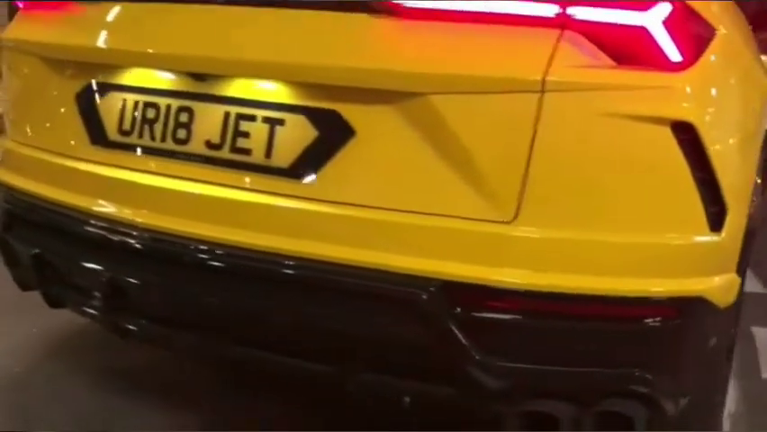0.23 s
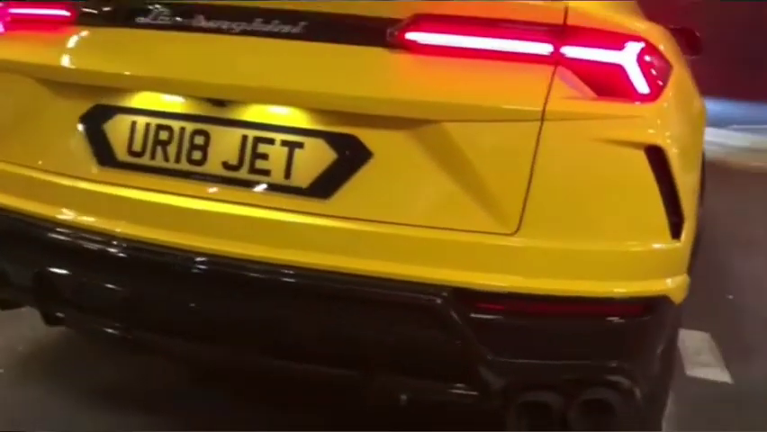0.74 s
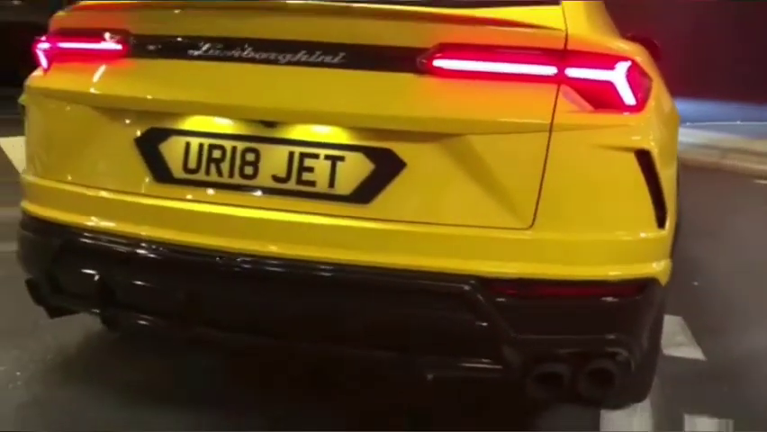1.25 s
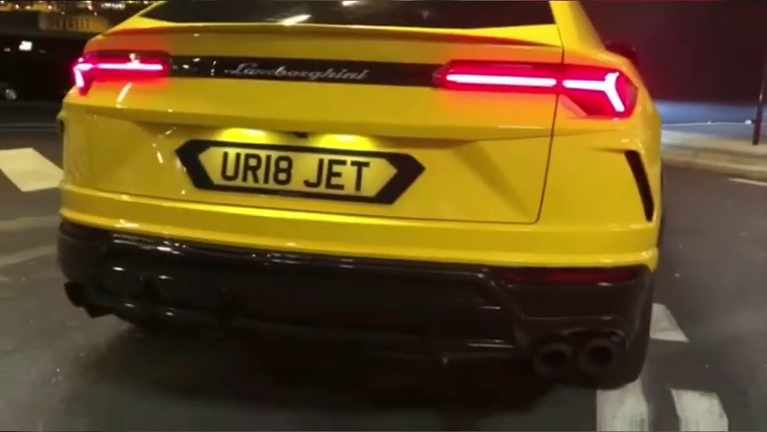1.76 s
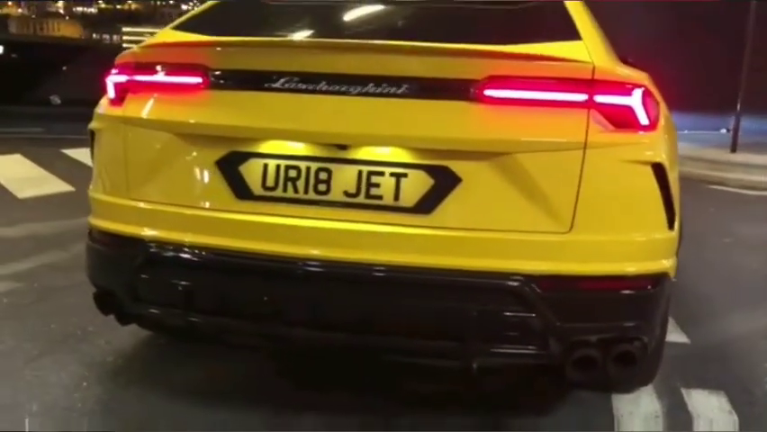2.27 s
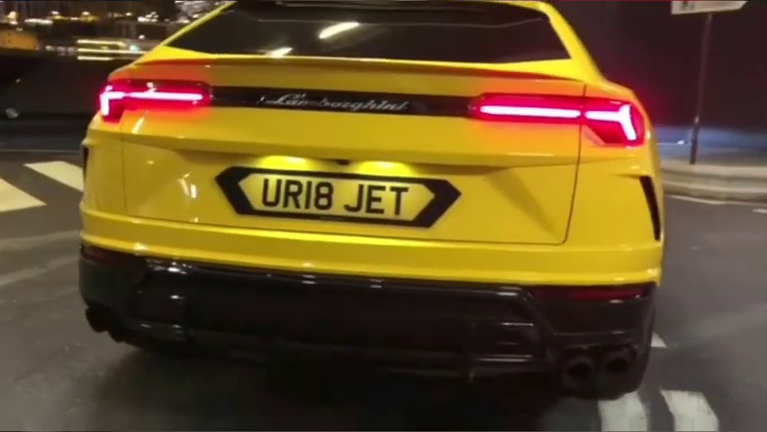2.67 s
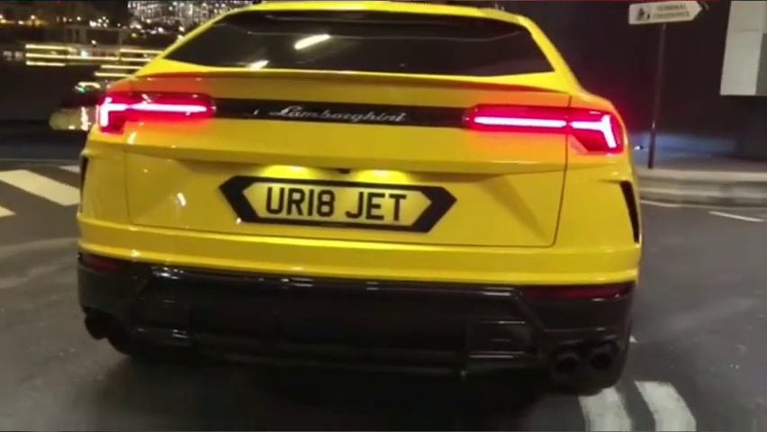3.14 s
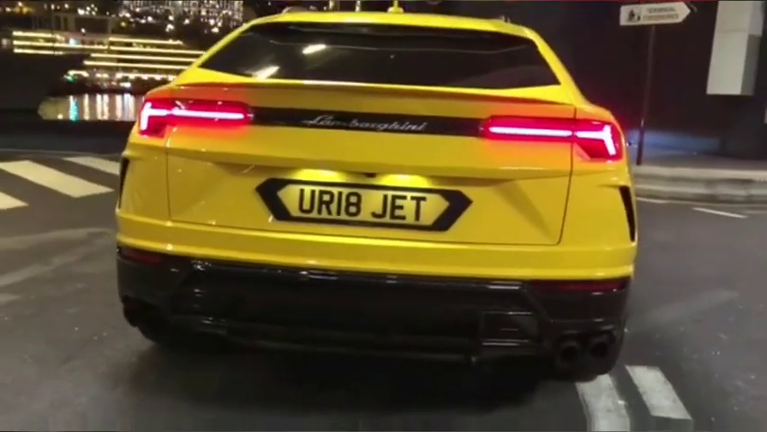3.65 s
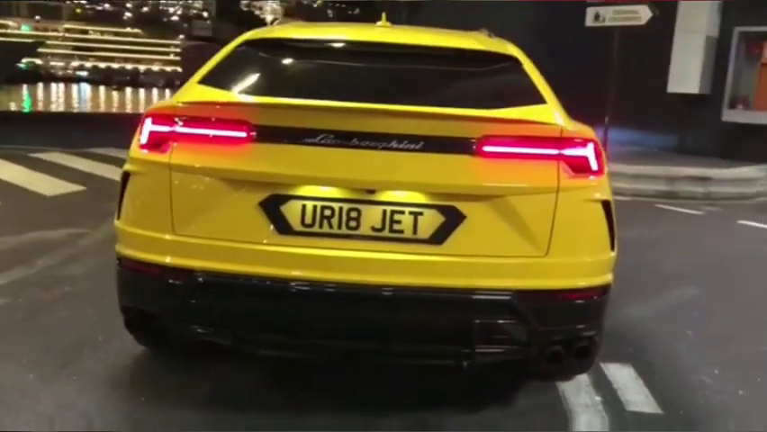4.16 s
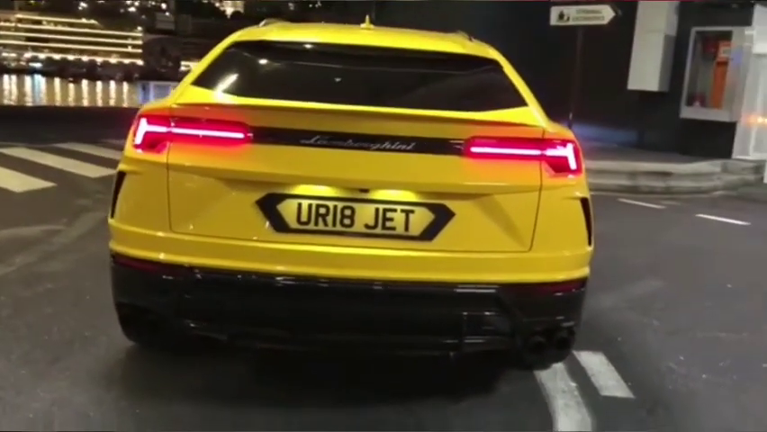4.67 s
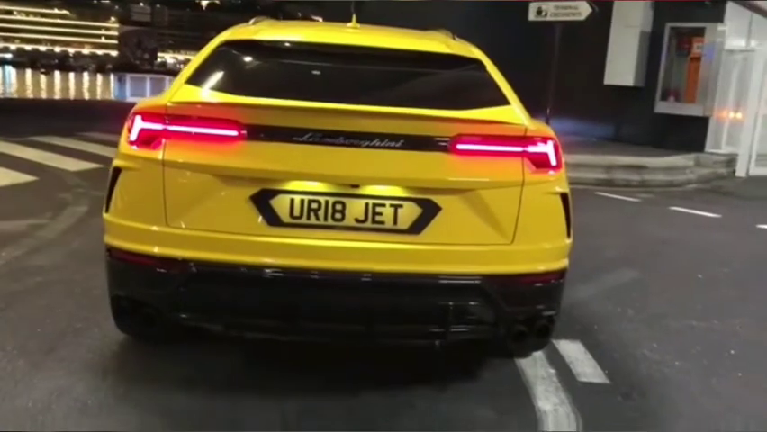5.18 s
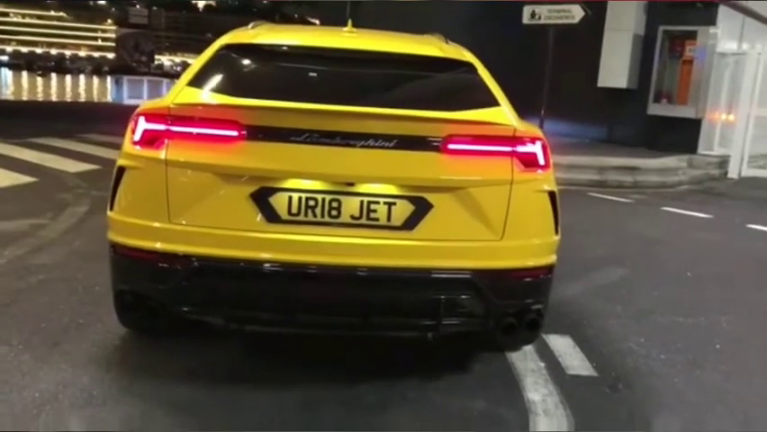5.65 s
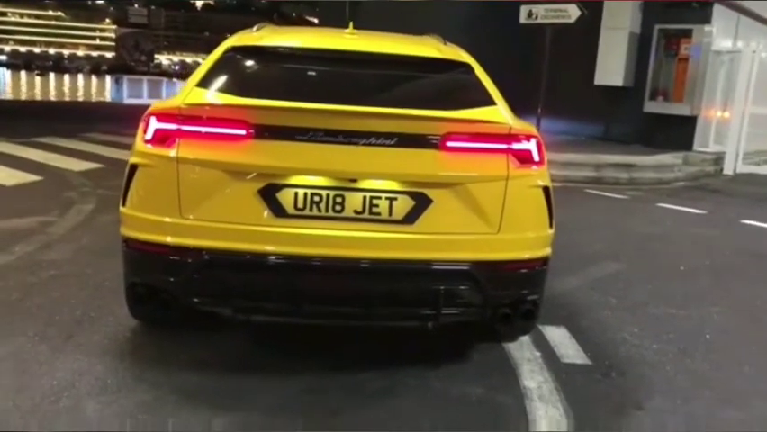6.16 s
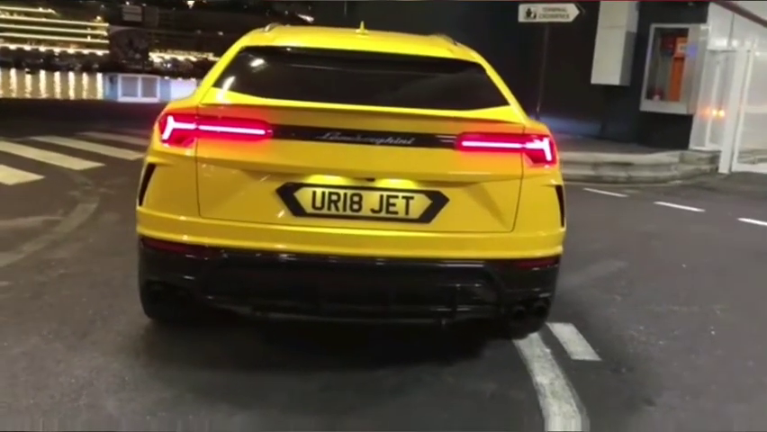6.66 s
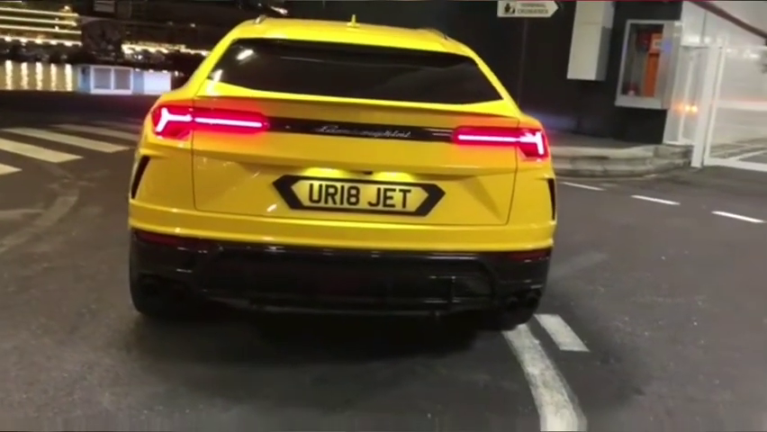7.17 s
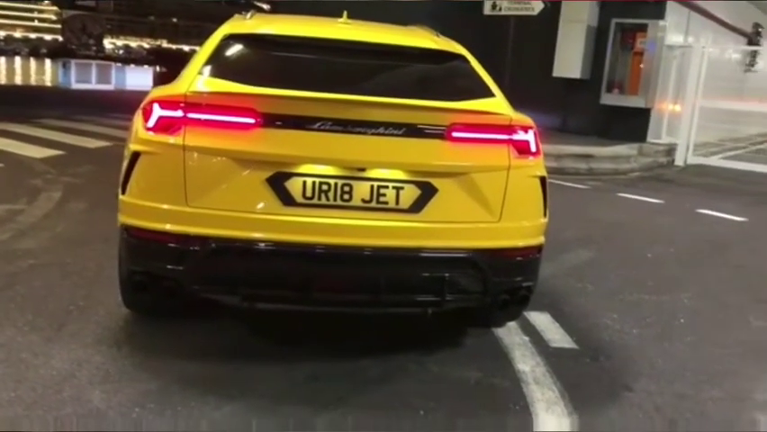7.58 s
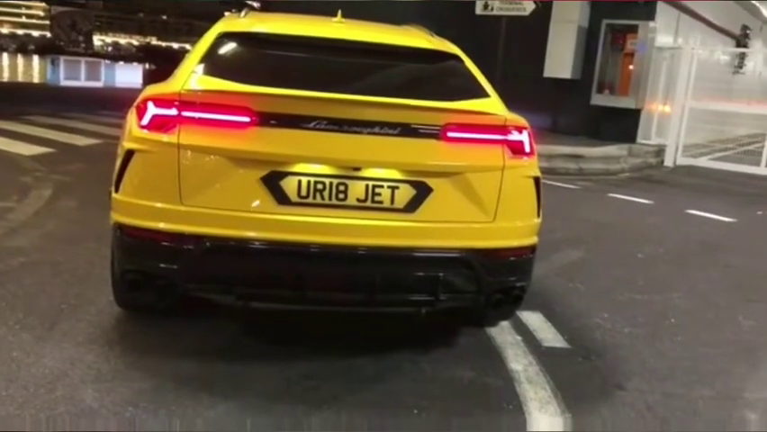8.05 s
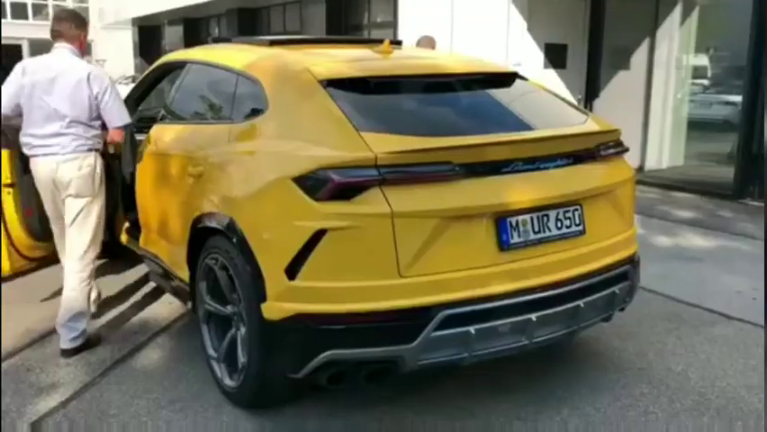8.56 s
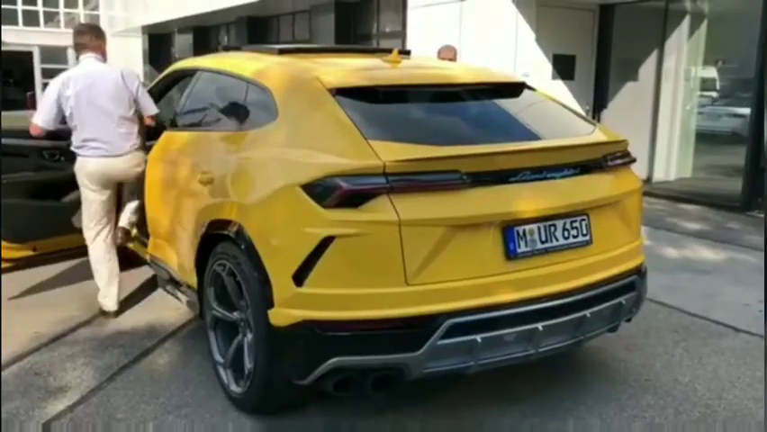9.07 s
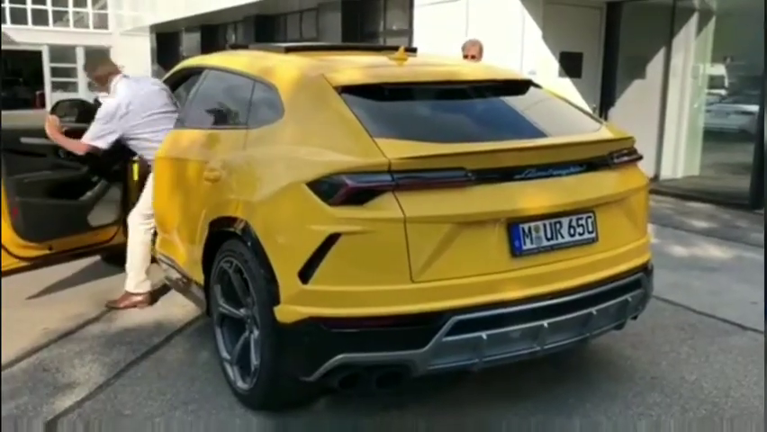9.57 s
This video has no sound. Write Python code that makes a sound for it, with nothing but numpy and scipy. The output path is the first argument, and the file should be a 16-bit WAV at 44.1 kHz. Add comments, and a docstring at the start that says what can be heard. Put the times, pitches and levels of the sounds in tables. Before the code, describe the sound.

A powerful V8 car revs five times with popping exhaust and air hisses, then cuts abruptly to a quiet idle.

```python
"""Turbo V8 revving at night

Five revs in a street, heard from just behind the tailpipes: the firing pulses make a deep note, a rumble
and a rasp. Unburnt fuel pops in the exhaust as the revs fall, and valves let off air with a hiss.
The sound cuts off abruptly; after a short silence a car idles quietly, farther away, and shoes scuff."""
import sys
import numpy as np
from scipy import signal
from scipy.fft import rfft, irfft, next_fast_len
from scipy.io import wavfile
from scipy.ndimage import uniform_filter1d, minimum_filter1d

SR = 44100
rng = np.random.default_rng(int(sys.argv[2]) if len(sys.argv) > 2 else 0)


def persist_wave(psi):
    """Save psi, clipped to +-1, as 16-bit WAV."""
    counts = np.round(np.clip(psi, -1, 1) * 32767).astype(np.int16)
    wavfile.write(sys.argv[1], SR, np.atleast_2d(counts).T)


N = 433062
TIME = np.arange(N) / SR

# punch of each cylinder, in firing order: level/dB
CYLINDER_DB = [0.5, 0.5, -1.5, -3, 2.5, 3.5, 2, 1.5]
# throttle blips: opens/s, crest/s, target firing rate/Hz, note/dB, rasp/dB, rush/dB
THROTTLE_BLIPS = [(0.881, 1.108, 195, -12.5, -16.5, -30), (2.668, 2.989, 202.9, -13, -17, -29),
                  (4.427, 4.65, 184.4, -20, -27, -40.5), (5.772, 6.074, 216.3, -15.5, -20.5, -33.5),
                  (7.835, 8.089, 179.5, -13, -20, -34.5)]
# fuel smouldering in the pipes: start/s, end/s, note lift/dB, rumble lift/dB, rasp lift/dB
SMOULDERS = [(1.305, 1.816, 2.5, 5.5, 2.5), (4.873, 5.242, -1, 2.5, 1), (6.26, 6.784, -2, 7, 2.5)]


def amp(db):
    """Decibels to gain."""
    return 10 ** (np.asarray(db) / 20)


def unit(x):
    """Scales to rms 1."""
    return x / np.sqrt(np.mean(x ** 2) + 1e-20)


def read(points, hz):
    """Reads a curve on a log-frequency axis."""
    f, value = np.transpose(points)
    return np.interp(np.log(hz + 1), np.log(f + 1), value)


def add(mix, s, sound):
    """Mixes a sound in at s seconds."""
    part = mix[round(s * SR):][:len(sound)]
    part += sound[:len(part)]


def gate(start, end, rise, fall):
    """Ramps from 0 to 1 after start and back to 0 after end."""
    return np.clip((TIME - start) / rise, 0, 1) * np.clip(1 - (TIME - end) / fall, 0, 1)


def wander(rate_hz):
    """Slow random drift of rms 1."""
    hz = np.fft.rfftfreq(N // 64, 64 / SR)
    slow = irfft(rfft(rng.standard_normal(N // 64)) / (1 + (hz / rate_hz) ** 4))
    return unit(np.interp(np.arange(N) / 64, np.arange(len(slow)), slow))


def colour(x, points, size=8192):
    """Causal EQ of unit energy: the curve sets only the shape, and falls steeply past its ends."""
    hz = abs(np.fft.fftfreq(size, 1 / SR)) + 1
    octaves_out = np.maximum(np.log2(points[0][0] / hz), 0) + np.maximum(np.log2(hz / points[-1][0]), 0)
    log_gain = np.log(amp(np.maximum(read(points, hz) - 30 * octaves_out, -100)))
    taps = np.fft.ifft(np.exp(np.conj(signal.hilbert(log_gain)))).real[:size // 2]
    return signal.oaconvolve(x, taps / np.linalg.norm(taps))[:len(x)]


def low_pass(x, edge_hz):
    """Steep high cut."""
    return signal.oaconvolve(x, signal.firwin(511, edge_hz, window=("kaiser", 9), fs=SR), "same")


def ringing(modes, t):
    """Damped modes struck at t = 0."""
    return sum(amp(db) * np.exp(-t / decay) * np.sin(2 * np.pi * hz * t) for hz, db, decay in modes)


def street_echo(x, echoes_per_s=2000):
    """Scattered echoes from road and house fronts, each band dying at its own speed."""
    # ring of the street: f/Hz, t60/s
    reverb_times = [(60, .25), (250, 0.99), (1000, 0.63), (4000, 0.51), (12000, 0.53)]
    taps = rng.standard_normal(SR) * (rng.random(SR) < echoes_per_s / SR)
    taps[:int(.005 * SR)] = 0  # pre-delay
    hz, t, bands = signal.stft(taps, SR, nperseg=256)
    fade = amp(-60 * t / read(reverb_times, hz)[:, None])
    tail = signal.istft(bands * fade, SR, nperseg=256)[1]
    return signal.fftconvolve(x, tail / np.linalg.norm(tail))[:N]


def hisses(bursts):
    """Bursts of bright noise that swell and die away."""
    # tone of the hiss: f/Hz, level/dB
    air_eq = [(500, -17), (1300, 18), (3000, 7.5), (5000, 7.5), (7000, 6), (10000, 2), (13500, -4)]
    t, level = np.arange(SR) / SR, np.zeros(N)
    for s, db, decay in bursts:
        rise = decay ** 2 / 0.1  # a long burst also opens slowly
        shape = (1 - np.exp(-(t / rise) ** 2)) * np.exp(-t / decay)
        add(level, s, amp(db) * shape / shape.max())
    return colour(level * rng.standard_normal(N), air_eq)


def shoe_scuffs():
    """Soles brush the ground beside the idling car."""
    # scuffs: t/s, level/dB, decay/s
    scuffs = [(8.872, -62, .012), (9.125, -52, 0.033), (9.323, -52.5, 0.038)]
    return hisses(scuffs)


def distant_idle(level_db=-44, waver_db=.8):
    """The soft wash of an idling car, with a few wavering tones."""
    # tone of the wash: f/Hz, level/dB
    wash_eq = [(15, -41), (25, -18), (72, -1), (233, -8.5), (272, -10.5), (293, -13), (431, -16),
               (1860, -21), (2530, -29), (3530, -31), (3820, -34), (6370, -43), (9370, -48), (10600, -49),
               (11500, -50), (15000, -73), (22000, -120)]
    # tones in the hum: f/Hz, level/dB
    tones = [(57.5, -58), (86.1, -51.5), (107, -63), (269.2, -60), (3612, -77)]
    hum = amp(level_db + waver_db * wander(7.5)) * unit(colour(rng.standard_normal(N), wash_eq))
    for hz, db in tones:
        hum += np.sqrt(2) * amp(db + 2.2 * wander(5)) * np.sin(2 * np.pi * hz * TIME + 0.52 * wander(3))
    return hum


def puffs_and_ticks():
    """Valves let off air, and the sharpest backfires add a bright tick."""
    # puffs and ticks: t/s, level/dB, decay/s
    bursts = [(1.215, -34.5, 0.018), (1.305, -28, .009), (1.325, -31, 0.039), (1.43, -41, 0.033),
              (1.486, -26.5, 0.004), (1.625, -33.5, .019), (2.095, -42, 0.018), (2.288, -35.5, .037),
              (2.41, -46.5, .04), (3.184, -26.5, 0.0097), (3.215, -25.5, 0.066), (3.53, -42, .04),
              (4.102, -47.5, 0.018), (5.03, -43, 0.03), (5.6, -48, .02), (5.8, -38, 0.016),
              (6.275, -34, 0.038), (6.588, -25, .007), (7.0, -49, 0.019), (7.203, -39.5, .025),
              (7.535, -49.5, 0.063)]
    return hisses(bursts)


def valve_snap(at_s=3.211, snap_db=-5.5, squeak_db=-18, squeak_hz=3070):
    """Air squeaks through a narrowing gap until the valve snaps shut."""
    # resonances of the valve: f/Hz, width/Hz, level/dB
    valve_modes = [(600, 540, -5), (1050, 290, 7.5), (2960, 180, 2.5), (3900, 1000, -16), (6414, 3000, -8),
                   (11000, 5200, -25)]
    t = TIME - at_s
    snap = np.exp(-abs(t) / np.where(t < 0, .004, .0026))
    swell = np.exp(-abs(t) / np.where(t < 0, .0075, .001))
    squeak = swell * np.sin(2 * np.pi * squeak_hz * t + 0.2 * wander(90))
    noise, ring = rng.standard_normal(N), np.zeros(N)
    for hz, width, db in valve_modes:
        ring += amp(db) * unit(signal.lfilter(*signal.iirpeak(hz, hz / width, fs=SR), noise))
    return amp(snap_db) * snap * unit(ring) + amp(squeak_db) * squeak


def sputter(pops_per_s=11, thump_db=-15, crack_db=-26, bark_db=-47):
    """Cues for small, loosely spaced pops while fuel smoulders, laid out like the backfires."""
    cues = []
    for start, end, *_ in SMOULDERS:
        for k, (late, size) in enumerate(rng.random((20, 2))):
            s = start + (k + late) / pops_per_s
            spread_db = 2 * size - 1
            if s < end:
                cues.append((s, thump_db + spread_db, crack_db + spread_db, bark_db + spread_db))
    return cues


def afterfire(start_hz=290, end_hz=62, glide_s=0.01204, full_pop_db=-8):
    """Each pop is a sharp shock, then a slug of gas whose thump sinks in pitch and rings the pipes."""
    # loud backfires, before the trims below: t/s, thump/dB, crack/dB, bark/dB
    backfires = [(1.304, -16, -10, -19), (1.309, -9, -7.5, -10.5), (1.333, -9, -18.5, -25),
                 (1.349, -11, -18, -32), (1.362, -7, -16.5, -21.5), (1.448, -9.5, -11.5, -36),
                 (1.462, -6, -34, -44), (1.486, -9.5, -14.5, -16), (1.525, -10, -18, -25),
                 (1.616, -7.5, -26, -35), (1.733, -12.5, -16.5, -25.5), (1.755, -8, -18, -58),
                 (1.869, -10, -16.5, -33.5), (1.951, -9.5, -30, -38), (2.29, -15.5, -31, -57),
                 (2.346, -21, -27.5, -54.5), (2.706, -12, -21, -35), (3.083, -9, -30, -54),
                 (3.368, -13.5, -26, -30.5), (3.436, -18, -39, -38), (3.529, -15, -25.5, -35.5),
                 (3.675, -18, -41, -41), (3.761, -23, -43, -45), (4.848, -10, -16.5, -20),
                 (4.874, -13.5, -13, -46.5), (5.003, -9, -19, -26.5), (5.021, -12, -20.5, -46),
                 (5.064, -10, -19, -41), (5.169, -9.5, -17.5, -30), (5.207, -8, -19, -35),
                 (5.382, -9.5, -18, -33), (5.417, -8, -36, -44), (5.468, -9.5, -18.5, -31),
                 (6.264, -9.5, -10.5, -21), (6.277, -14.5, -16, -32.5), (6.318, -11, -15, -32),
                 (6.35, -9.5, -37, -31), (6.428, -4, -14, -26.5), (6.481, -9, -17, -23.5),
                 (6.509, -13, -15.5, -42.5), (6.556, -7, -14.5, -28), (6.59, -8.5, -19, -30),
                 (6.654, -9, -14.5, -38), (6.695, -7.5, -17, -29), (6.756, -9.5, -19.5, -28),
                 (6.781, -5.5, -14, -25.5), (7.495, -20, -26.5, -48), (8.125, -22.5, -12.5, -29),
                 (8.277, -7.5, -15.5, -25.5), (8.294, -11.5, -19.5, -46)]
    # low modes of the exhaust pipes: f/Hz, level/dB, decay/s
    pipe_modes = [(61.3, -6.5, 0.029), (145.1, -20, 0.04), (215.6, -17.5, 0.04)]
    # the tailpipe's ring under a shock: f/Hz, level/dB, decay/s
    tailpipe_modes = [(740, -6.5, 0.0046), (1088.5, 2.5, 0.006), (1282, -8, 0.006), (2176, -18.5, 0.0074)]
    # tone of the midrange crack and of the bright bark: f/Hz, level/dB
    crack_eq = [(200, -24.5), (400, 4.5), (700, -4.5), (880, 0.5), (1130, 0), (1330, -3), (1600, -21.5),
                (2100, -21), (2700, -30.5), (5000, -68)]
    bark_eq = [(1200, 6.5), (1850, 10.5), (2250, 4), (2650, 0), (3250, 0.5), (3900, -3), (4700, -14.5),
               (7000, -22), (14000, -30.5)]
    t = np.arange(int(.2 * SR)) / SR
    wash = 0.31 * (1 - np.exp(-t / 0.0071)) * np.exp(-t / 0.026)  # burnt gas churning behind the shock
    pops = np.zeros(N)
    for s, thump_db, crack_db, bark_db in backfires + sputter():
        chance, grit = rng.standard_normal(2), rng.standard_normal((2, len(t)))
        heat = np.exp(0.059 * chance[1])  # hotter gas rings higher
        top_hz = start_hz * 2 ** (0.12 * min(thump_db - full_pop_db, 0))  # a weak pop starts lower
        glide = np.exp(-t / (glide_s * np.exp(0.23 * chance[0])))
        hz = heat * (end_hz + (top_hz - end_hz) * glide)
        slug = np.exp(-t / 0.022) * np.sin(2 * np.pi * np.cumsum(hz) / SR)
        attack = 1 - np.exp(-(t / 0.0027) ** 2)
        thump = attack * (slug + ringing(pipe_modes, heat * t))
        blast = colour(grit[0] * (np.exp(-t / 0.0028) + 2.75 * wash), crack_eq, size=2048)
        crack = unit(ringing(tailpipe_modes, heat * t)) + 0.92 * unit(blast)
        bark = colour(5 * (t == 0) + grit[1] * (np.exp(-t / 0.004) + 0.3 * wash), bark_eq, size=2048)
        add(pops, s, -amp(thump_db - 12) * unit(thump))
        add(pops, s, amp(crack_db - 12.5) * unit(crack) + amp(bark_db - 13) * unit(bark))
    return pops


def firing_rate(start_hz=163.1, tickover_hz=79.17, climb_hz_per_s=425, sag_hz_per_s=88):
    """The engine climbs steeply to each crest, sags slowly after it and settles at tick-over."""
    crest_knee_hz, settle_knee_hz = 21.97, 6  # round off the corners
    hz = start_hz - sag_hz_per_s * TIME
    for _, crest, target_hz, *_ in THROTTLE_BLIPS:
        t = TIME - crest
        shortfall = np.logaddexp(-climb_hz_per_s * t / crest_knee_hz, sag_hz_per_s * t / crest_knee_hz)
        hz = np.maximum(hz, target_hz - crest_knee_hz * shortfall)
    return settle_knee_hz * np.logaddexp(hz / settle_knee_hz, tickover_hz / settle_knee_hz)


def coasting(firing_hz, rush_re_rasp_db=-18):
    """Throttle shut: gains of note, rumble, rasp and rush, shaped by speed and smouldering fuel."""
    # base levels of each run-down: start/s, note/dB, rumble/dB, rasp/dB
    run_downs = [(0, -29, -27.5, -29), (1.1, -26, -24.5, -29.5), (3.15, -43, -29.5, -34.5),
                 (3.8, -42.5, -35, -37.5), (4.65, -28, -27.5, -34), (6.07, -28.5, -26, -32),
                 (7.15, -29, -26.5, -32)]
    # the note booms at certain speeds: firing rate/Hz, lift/dB
    boom = [(80, -3), (92, 4.5), (106, -5.5), (124, 2), (141, 8.5), (160, -1), (185, -12.5)]
    # rasp by speed, lifted where fuel returns near tick-over: firing rate/Hz, lift/dB
    rasp_lift = [(80, -4.5), (92, 0), (108, -2.5), (135, 0), (160, 2.5), (190, 3)]
    rows = np.array(run_downs)
    current = np.searchsorted(rows[1:, 0], TIME)
    levels = uniform_filter1d(rows[current, 1:].T, size=3000)
    for start, end, *lift_db in SMOULDERS:
        levels += np.outer(lift_db, gate(start, end, rise=0.048, fall=0.24))
    note_db, rumble_db, rasp_db = levels
    rasp_db = rasp_db + read(rasp_lift, firing_hz)
    return amp([note_db + read(boom, firing_hz), rumble_db, rasp_db, rasp_db + rush_re_rasp_db])


def pulling(attack_s=0.037, hold_s=0.058, release_s=0.054, fuel_cut_s=0.22):
    """Throttle open: load (0-1) and the gains of note, rumble, rasp and rush."""
    load, gains = np.zeros(N), np.zeros((4, N))
    top_rasp_db = max(blip[4] for blip in THROTTLE_BLIPS)
    for opens, crest, _, note_db, rasp_db, rush_db in THROTTLE_BLIPS:
        before, after = np.maximum(crest - TIME, 0), np.maximum(TIME - crest, 0)
        pull = gate(opens, crest + hold_s, attack_s, release_s)
        # the note builds more slowly and lingers until the fuel is cut
        build = gate(opens, crest + hold_s, rise=0.05, fall=release_s)
        linger = (1 - pull) * gate(crest, crest + fuel_cut_s, attack_s, attack_s) * amp(-10.5)
        # the rumble shudders as the throttle opens and shuts
        shudder = np.sin(np.pi * pull) * amp(np.where(TIME < crest, -24, -22.5) + rasp_db - top_rasp_db)
        load += pull
        gains += [(build + linger) * amp(note_db - 8.4 * before),
                  pull * amp(note_db - 14) + shudder,
                  # rasp and rush swell as the turbos spool up, then fade; slopes in dB per second
                  pull * amp(rasp_db - 31 * before - 6 * after),
                  pull * amp(rush_db - 52.6 * before - 77 * after)]
    return load, gains


def by_load(load, shut, wide_open):
    """Crossfades between the coasting and the pulling engine."""
    return shut + load * (wide_open - shut)


def firing_note(firings, firing_hz, load):
    """The tone at the firing rate, with the partials that unequal cylinders add around it."""
    # partials: multiple of the four-stroke cycle rate (8 = firing rate), shut level/dB, open level/dB
    partials = [(3, -19.5, -43), (4, -28, -49.5), (5, -49, -16.5), (6, -6, -12), (7, -16, -34),
                (9, -25.5, -18), (12, -24, -23.5), (14, -18.5, -22), (16, -18.5, -18), (24, -25, -28.5)]
    # standing waves in the pipes lift a partial gliding through them: f/Hz, gain/dB
    pipe_eq = [(60, 1), (100, -14), (143, 6.5), (200, 5.5), (280, -4), (335, 7.5), (352, 7.5), (372, -3),
               (420, -4.5), (520, 3.5)]
    cycle_phase = 2 * np.pi * firings / len(CYLINDER_DB)
    note = np.sin(2 * np.pi * firings) * amp(by_load(load, 2.5, 1.5) * wander(24))
    for order, shut_db, open_db in partials:
        pipe_db = read(pipe_eq, order * firing_hz / len(CYLINDER_DB))
        gain = amp(by_load(load, shut_db, open_db) + pipe_db + 2.9 * wander(4.2))
        note += gain * np.sin(order * cycle_phase + 2 * np.pi * rng.random())
    return np.sqrt(2) * note


def exhaust_pulses(firings, scatter_db=3, bank_lag_s=0.00025):
    """One click a firing: each cylinder has its own punch, and one bank's pipe is longer."""
    at = np.flatnonzero(np.diff(np.floor(firings)))
    cylinder = np.arange(len(at)) % len(CYLINDER_DB)
    chance = rng.standard_normal(N // 100)[:len(at)]
    late = np.round(bank_lag_s * SR * (cylinder % 2)).astype(int)
    clicks = np.zeros(N)
    clicks[np.clip(at + late, 0, N - 1)] = amp(np.take(CYLINDER_DB, cylinder) + scatter_db * chance)
    return clicks


def turbulence(clicks, decay_s, steady):
    """Gas noise that flares at each click and dies away, over a steady bed."""
    flare = signal.lfilter([1], [1, -np.exp(-1 / (decay_s * SR))], clicks)
    return unit((unit(flare) + steady) * rng.standard_normal(N))


def silencer_smear(x, spread_s=0.0051, ripple_hz=310):
    """Echoes in the silencer hold some frequencies back, smearing each pulse but keeping its colour."""
    size = next_fast_len(N + SR // 10)
    hz = np.fft.rfftfreq(size, 1 / SR)
    delay = spread_s * (1 + np.sin(2 * np.pi * hz / ripple_hz) * np.cos(np.sqrt(hz))) / 2
    return irfft(rfft(x, size) * np.exp(-2j * np.pi * np.cumsum(delay) * hz[1]), size)[:N]


def exhaust_rasp(clicks, firing_hz, load):
    """Hard pulses under load and at speed, a smoother flow on the overrun."""
    # tone of the rasp close up and from farther behind: f/Hz, level/dB
    close_eq = [(280, -20.5), (360, -5), (460, -8.5), (610, -0.5), (800, 0), (1050, -3), (1280, -4.5),
                (1650, -13), (2300, -18), (3200, -30.5), (5000, -50.5)]
    behind_eq = [(280, 0), (340, -5), (430, -1.5), (560, -2), (760, -3.5), (930, -3.5), (1090, 2.5),
                 (1170, 0), (1280, -1.5), (1420, -10), (1750, -13.5), (2250, -15), (2900, -30), (3700, -25),
                 (5000, -41)]
    grit = turbulence(clicks, decay_s=0.0045, steady=by_load(load, 1.15, 1))
    hardness = by_load(load, .3, 1) * np.minimum(firing_hz / 160, 1)
    drive = hardness * unit(silencer_smear(clicks)) + by_load(load, .8, .68) * grit
    # the rasp's tone shifts as the listener moves farther behind the tailpipes
    behind = np.clip((TIME - 1.15) / 2.2, 0, 1)
    return (1 - behind) * unit(colour(drive, close_eq)) + behind * unit(colour(drive, behind_eq))


def engine():
    """The V8 in two stems: bass (firing note, silencer rumble) and roar (rasp, rush of gas)."""
    # tone of the silencer's rumble and of the rushing gas: f/Hz, level/dB
    rumble_eq = [(22, -46), (35, -6), (50, -10.5), (65, 4), (100, -2), (150, -1.5), (200, 0), (260, -8),
                 (310, -10.5), (400, -19.5), (700, -36.5)]
    rush_eq = [(1200, -28), (2500, 9.5), (4000, 5.5), (5200, 1.5), (7000, 0.5), (10000, -6.5),
               (13500, -12.5)]
    firing_hz = firing_rate()
    load, pull_gains = pulling()
    note_gain, rumble_gain, rasp_gain, rush_gain = pull_gains + (1 - load) * coasting(firing_hz)
    firings = np.cumsum(firing_hz * (1 + .005 * wander(25))) / SR  # running count, slightly uneven
    note = firing_note(firings, firing_hz, load)
    clicks = exhaust_pulses(firings) / np.sqrt(firing_hz)
    throb = 0.18 * unit(clicks) + turbulence(clicks, decay_s=0.0041, steady=0.44)
    rumble = unit(colour(throb, rumble_eq))
    rasp = exhaust_rasp(clicks, firing_hz, load)
    rush = unit(colour(turbulence(clicks, decay_s=0.0029, steady=2.5), rush_eq))
    return note * note_gain + rumble * rumble_gain, rasp * rasp_gain + rush * rush_gain


def scene(cut_s=8.304, idle_from_s=8.399):
    """The revving car up to a hard cut, a beat of silence, then the idle."""
    bass, roar = engine()
    pops = afterfire()
    air = puffs_and_ticks() + valve_snap()
    echo = street_echo(amp(-8.5) * roar + amp(-7.5) * pops + amp(-11.5) * air)
    revving = bass + amp(-2.5) * roar + pops + air + echo
    idling = low_pass(distant_idle() + shoe_scuffs(), edge_hz=11700)
    return (revving * (TIME < cut_s) + idling * (TIME > idle_from_s))[None]


def record(dry, low_cut_hz=34, ceiling=.71, high_cut_hz=14100):
    """The microphone sheds the deepest bass, a fast limiter flattens peaks, a high cut trims the top."""
    sound = signal.sosfilt(signal.butter(2, low_cut_hz, "highpass", fs=SR, output="sos"), dry[0])
    gain = np.minimum(1, ceiling / (abs(sound) + 1e-9))
    gain = uniform_filter1d(minimum_filter1d(gain, size=21), size=21)
    return low_pass(sound * gain, high_cut_hz)[None]


dry = scene()
out = record(dry)
persist_wave(out)
```